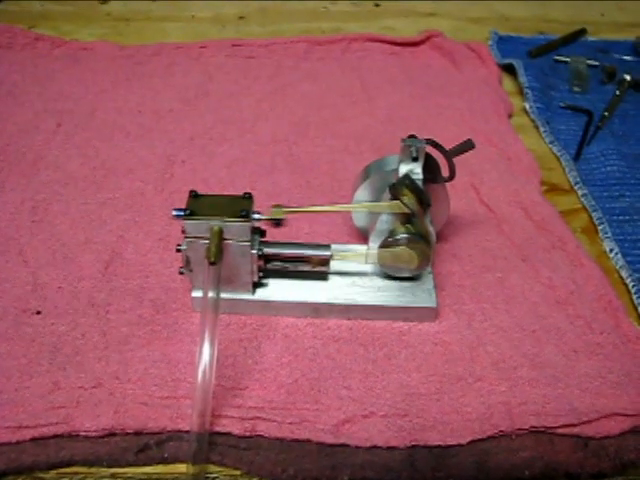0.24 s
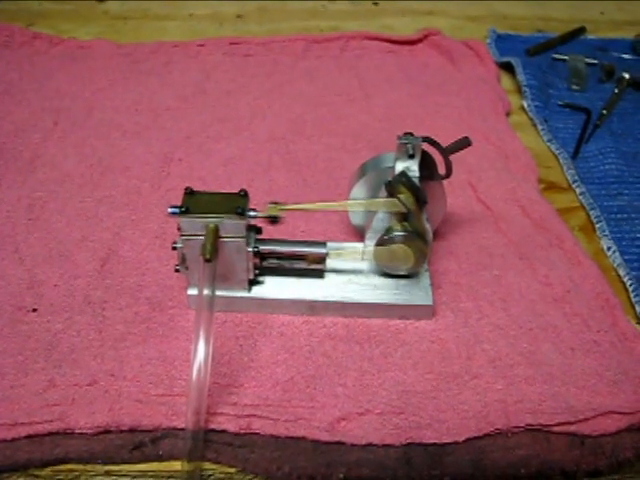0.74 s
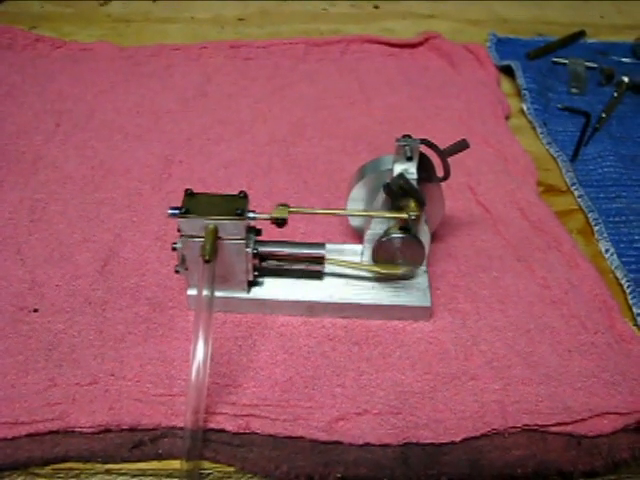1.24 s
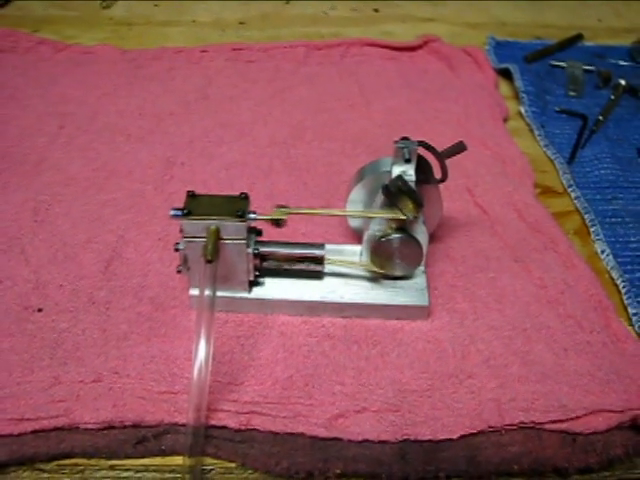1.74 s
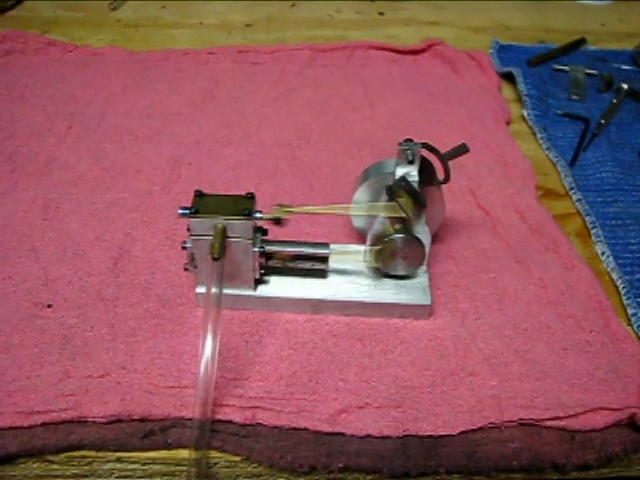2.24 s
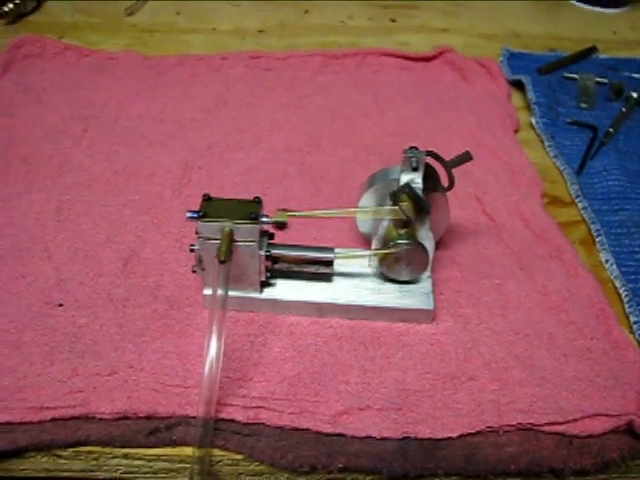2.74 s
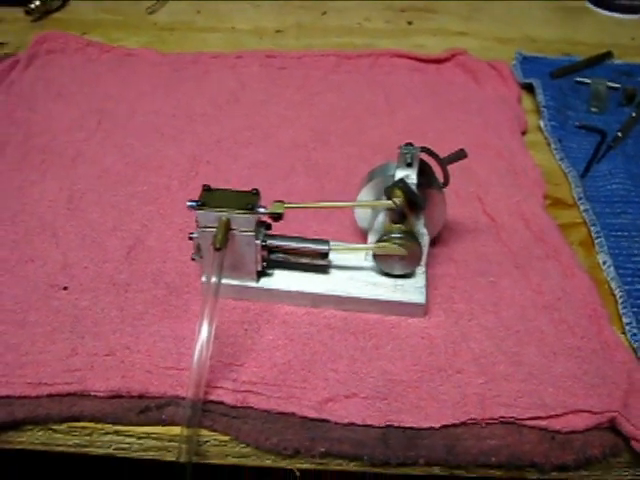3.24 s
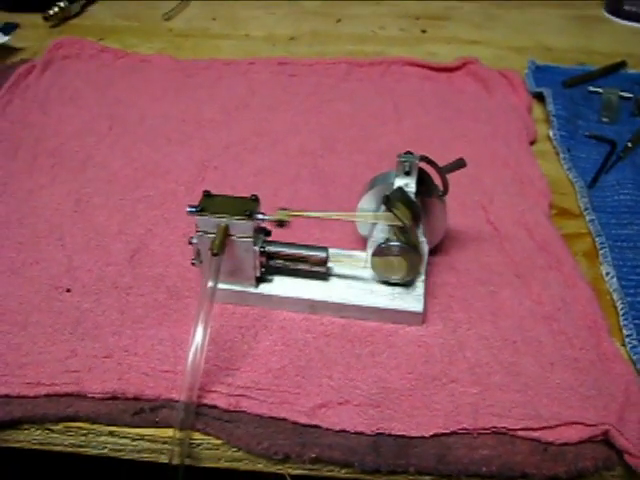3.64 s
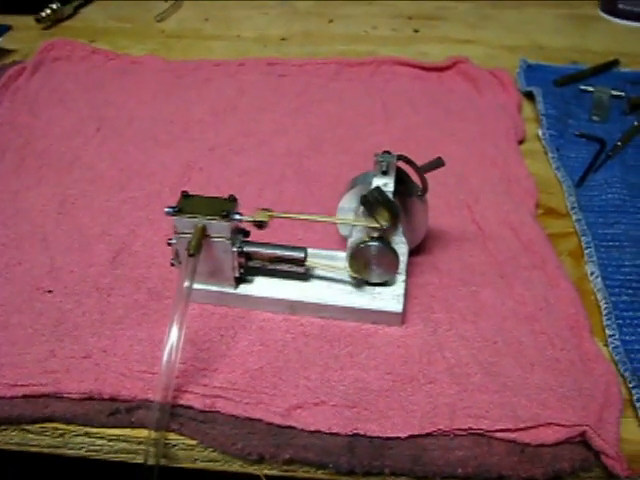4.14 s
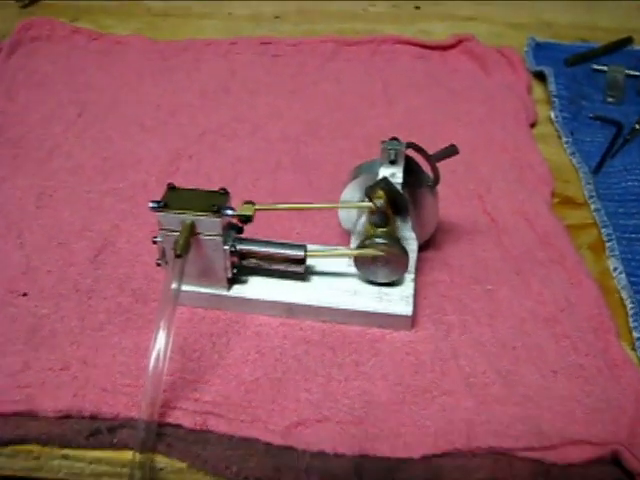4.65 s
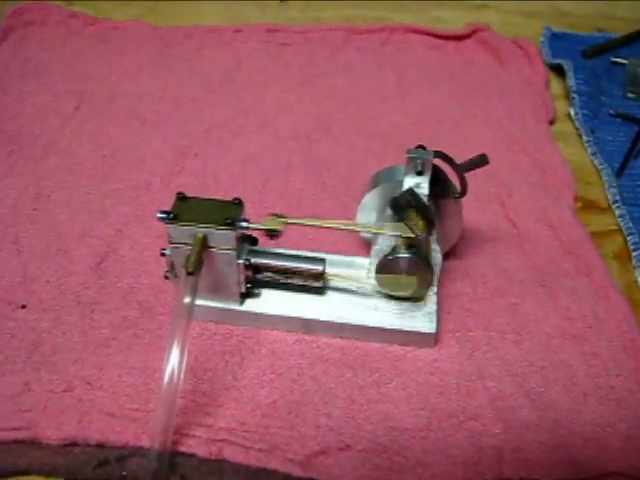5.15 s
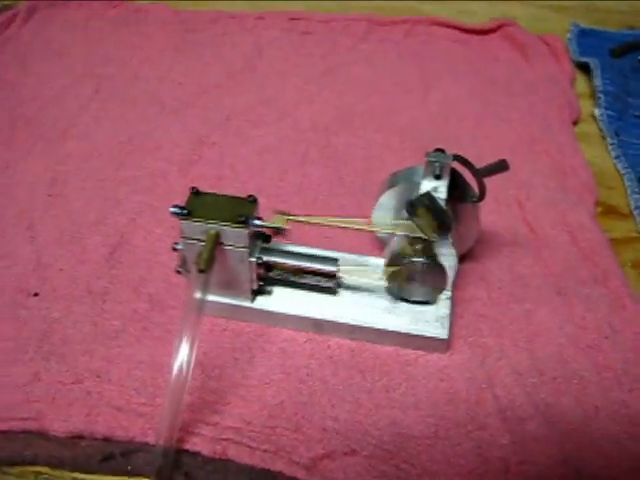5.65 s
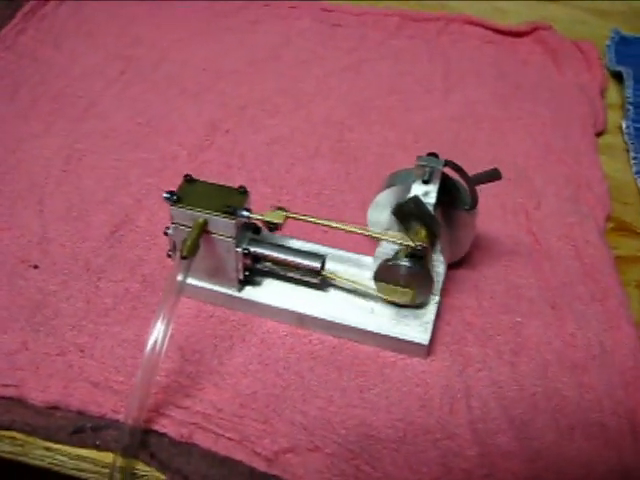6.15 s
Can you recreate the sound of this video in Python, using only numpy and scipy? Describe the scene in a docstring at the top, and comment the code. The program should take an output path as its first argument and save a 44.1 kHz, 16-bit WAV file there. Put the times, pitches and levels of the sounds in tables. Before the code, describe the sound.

From 0 s a small model engine is already running on compressed air, close and dry in stereo, at nearly ten turns per second. Every turn has a hard, bright crank knock, preceded by a light valve-gear tick and loose rattle, with a small valve pop half a turn later. Two slightly different sharp, airy exhaust hisses alternate, making a continuous chuffing chatter. Soft low thumps ring the bench under a quiet hum, rumble and room noise. Knocks vary a little in strength, some fuller between about 1.3 and 2.3 s; hiss and hum dip briefly near 2.6 s. A faint low whine surfaces around 1 s and again from 3.7 to 4.4 s. The pace eases very slightly toward the end. Between 4.9 and 5.7 s a few dull handling bumps thud and scrape near the microphone. The engine keeps running until the cut at about 6.4 s.

```python
"""A small model steam engine runs on compressed air on a cloth-covered bench, heard close up in stereo.
From the start, hum, rumble and room noise (tones and shaped noise) lie under two alternating exhaust hisses.
Each turn, soft pushes thump the bench modes; the valve gear ticks, the gear rattles, the crank knocks and
the valve pops open half a turn later, all as blows that ring one set of frame modes. A faint whine comes
and goes; late on, a few dull handling bumps (a ring and a noise burst) thud and scrape near the microphone."""
import sys
import numpy as np
from scipy import signal
from scipy.fft import rfft, irfft
from scipy.io import wavfile
from scipy.ndimage import uniform_filter1d

SR = 44100
rng = np.random.default_rng(int(sys.argv[2]) if len(sys.argv) > 2 else 0)


def digitize_waveform(pressure):
    """Quantize a signal to 16-bit integers and store it at the path in sys.argv[1].

    Rows of a 2-D input are taken as channels; values are limited to [-1, 1].
    """
    field = np.atleast_2d(pressure).T
    bounded = np.clip(field, -1, 1)
    quanta = np.round(bounded * 32767).astype(np.int16)
    wavfile.write(sys.argv[1], SR, quanta)


N = 281799  # samples


def undb(db):
    """Gain from decibels."""
    return 10 ** (np.asarray(db) / 20)


def curve(x, table):
    """Second column of a two-column table, read at x along the first."""
    return np.interp(x, *np.transpose(table))


def walk(rate_hz):
    """Random levels held for 1 / rate_hz seconds and slewed twice; spread near 1."""
    hold = int(SR / rate_hz)
    steps = np.repeat(rng.standard_normal(N // hold + 1), hold)
    return 1.173 * uniform_filter1d(uniform_filter1d(steps, hold), hold)[:N]


def ring(force, hz, t60_s):
    """One damped mode as a two-pole resonator; a unit impulse rings it with amplitude near 1."""
    decay = np.exp(-np.log(1000) / (t60_s * SR))
    step = 2 * np.pi * hz / SR
    return signal.lfilter([0, decay * np.sin(step)], [1, -2 * decay * np.cos(step), decay * decay], force)


def strikes(times_s, size):
    """Impulses of the given sizes at the given times."""
    at = np.round(np.asarray(times_s) * SR).astype(int)
    keep = (at >= 0) & (at < N)
    return np.bincount(at[keep], np.asarray(size)[keep], N)


# stereo width of the diffuse noise: (frequency [Hz], side minus mid [dB])
SIDE_WIDTH = [(60, -20), (110, -2), (200, -3), (380, -13.5), (700, -12), (1290, -14), (2380, -11),
              (4400, -2), (8120, -7.5), (15000, 2.5)]
# left-right balance of the diffuse noise: (frequency [Hz], left minus right [dB])
BALANCE = [(60, 6), (110, -1), (200, 6), (380, 0.5), (700, 0), (1290, 2), (2380, -2.5), (4400, 3.5),
           (8120, 1.0), (15000, 0)]


def wide_noise(spectrum):
    """Stereo noise of a given spectrum, rms 1; an independent side signal widens it."""
    log_hz = np.log(np.fft.rfftfreq(N, 1 / SR) + 1)

    def read(table):
        hz, db = np.transpose(table)
        return np.interp(log_hz, np.log(hz), db)

    mid, side = rfft(rng.standard_normal((2, N))) * undb(read(spectrum))
    side = side * undb(read(SIDE_WIDTH))
    lean = undb(read(BALANCE) / 2)
    out = irfft(np.array([(mid + side) * lean, (mid - side) / lean]), N)
    return out / np.std(out)


# running levels: (time [s], hiss [dB before stroke gain and flow], hum [dB before waver])
LEVELS = [(0.0, -30.5, -73), (0.3, -32, -55), (.85, -30.5, -55.5), (1.5, -29.5, -55), (2.1, -29, -55),
          (2.46, -30, -53), (2.63, -33, -68), (2.76, -33, -56.5), (3.6, -31, -51.5), (4.38, -29.5, -48),
          (4.48, -31.5, -58), (5.25, -30.5, -52), (5.71, -31, -57), (6.39, -30.5, -51.5)]


def each_turn(times_s, db, spread_db=.9):
    """Level of a moving part at given times: it follows the hiss and differs a little every turn."""
    at, hiss_db, _ = np.transpose(LEVELS)
    return np.interp(times_s, at, hiss_db) + db + spread_db * rng.standard_normal(len(times_s))


def crank():
    """Turn times, the knocks plus one turn at each end, and the crank angle in turns."""
    knock_s = np.array(KNOCKS)[:, 0]
    turns = np.r_[2 * knock_s[0] - knock_s[1], knock_s, 2 * knock_s[-1] - knock_s[-2]]
    return turns, np.interp(np.arange(N) / SR, turns, np.arange(len(turns))) % 1


# workshop tones, in order hum, whine, rumble: (mean frequency [Hz])
TONES = [120, 282, 28]
# the faint whine that comes and goes: (time [s], level [dB before waver])
WHINE = [(0, -68), (.75, -68), (.9, -61), (1.1, -68), (3.6, -67), (3.75, -56), (4.4, -57), (4.55, -68),
         (6.39, -68)]
# spectrum of the room noise: (frequency [Hz], relative level [dB per Hz])
ROOM = [(20, -14), (40, -19), (70, 12), (150, -8.5), (300, 3), (700, 2), (1200, -19), (3000, -15),
        (16000, -63)]


def workshop(rumble_db, room_db=-55):
    """Three low tones, unsteady in level and pitch, over soft room noise."""
    t = np.arange(N) / SR
    at, _, hum_db = np.transpose(LEVELS)
    levels_db = [np.interp(t, at, hum_db), curve(t, WHINE), rumble_db]
    tones = 0
    for hz, db in zip(TONES, levels_db):
        waver_db = 3.5 * walk(16)
        drift = 1 + .015 * walk(14)
        tones = tones + undb(db + waver_db) * np.sin(2 * np.pi * np.cumsum(hz * drift) / SR)
    return tones + undb(room_db) * wide_noise(ROOM)


# hiss spectrum of the return stroke: (frequency [Hz], relative level [dB per Hz])
BACK_HISS = [(470, -34), (800, -12.5), (1030, -5), (1880, -3), (2150, -5), (2870, -4.5), (3340, -8),
             (5110, 0.5), (6330, -9.5), (7450, -2), (9690, -3), (10800, 2), (11800, -6.5), (15200, -5.5),
             (16000, -50)]
# exhaust flow of the return stroke: (crank angle [turns], level [dB before gain])
BACK_FLOW = [(0, -8), (.06, -20), (.15, -25), (.495, -25), (.515, 0), (.64, 0), (1, -9)]
# hiss spectrum of the out stroke: (frequency [Hz], relative level [dB per Hz])
OUT_HISS = [(470, -22.5), (950, -8.5), (1250, -4.5), (1700, -1.5), (2300, -6.5), (2900, -7), (3600, -9),
            (4300, -6.5), (5050, 3), (6200, -13), (7500, -2.5), (9600, -3), (11000, 2), (12800, -11),
            (14700, -5.5), (16000, -18)]
# exhaust flow of the out stroke: (crank angle [turns], level [dB before gain])
OUT_FLOW = [(0, -25), (.06, -10), (.17, -4), (.25, -2), (.35, -4), (.495, -12), (.515, -25), (1, -25)]


def exhaust(angle, out_gain_db=4.0, back_gain_db=1.37):
    """Each stroke hisses through its own port as gated shaped noise; the jet flickers slightly."""
    at, hiss_db, _ = np.transpose(LEVELS)
    strokes = ((OUT_HISS, OUT_FLOW, out_gain_db), (BACK_HISS, BACK_FLOW, back_gain_db))
    hiss = 0
    for colour, flow, gain_db in strokes:
        flicker_db = .6 * walk(150) + .9 * walk(800)
        hiss = hiss + wide_noise(colour) * undb(curve(angle, flow) + gain_db + flicker_db)
    return hiss * undb(np.interp(np.arange(N) / SR, at, hiss_db))


def rumble_cut(x, cut_hz=55):
    """High-pass that takes the lowest bass off the bench and the handling."""
    return signal.sosfilt(signal.butter(2, cut_hz, "high", fs=SR, output="sos"), x)


# pushes on the bench in a turn: (crank angle [turns], level re the thump [dB before scatter], direction [+1/-1])
PUSHES = [(.065, -9, 1), (.395, -5, -1), (.455, -7, -1), (.6, -6, 1), (.85, -12, -1), (.92, -2, 1),
          (.955, -2, -1), (.985, -5, 1)]
# modes of the bench top: (frequency [Hz], t60 [s], level [dB])
BENCH = [(70, 0.058, -5), (160.8, 0.099, -12), (186, 0.017, -4.5), (211, 0.064, -5.5), (433, 0.011, -15)]


def bench(turns, thump_db=-7.5, push_s=0.0006, scatter_db=2.0):
    """Soft pushes from the reversing piston ring the modes of the bench top."""
    thump = each_turn(turns[1:], thump_db)
    force = 0
    for turn, db, direction in PUSHES:
        push_db = thump + db + scatter_db * rng.standard_normal(len(thump))
        force = force + strikes(turns[:-1] + turn * np.diff(turns), direction * undb(push_db))
    force = uniform_filter1d(force, int(push_s * SR))
    return rumble_cut(sum(undb(db) * ring(force, hz, t60_s) for hz, t60_s, db in BENCH))


# valve timing in turns: the rod ticks just before the knock, the valve pops half a turn after it
TICK_TURN, POP_TURN, PLAY_S = .861, .519, .0003
# levels re the running hiss level, before each mode's share: low ring of the knock, tick, rattle, pop
LOW_DB, TICK_DB, RATTLE_DB, POP_DB = 12.5, 8.5, 6, 10
RATTLE_FADE_DB_PER_S, LOW_SWELL_DB_PER_S = -.5, .35  # the rattle weakens and the knock deepens with time
# crank knocks, one a turn: (time [s], middle ring [dB before mode share], high ring [dB before mode share])
KNOCKS = [(.0336, -18.9, -16), (.1335, -12.4, -8), (.2347, -21.3, -16.3), (.336, -18.4, -17),
          (.4356, -16.9, -17.3), (.5347, -21.1, -13.3), (.6333, -18.6, -17.7), (.7351, -18.1, -17.9),
          (.8391, -18.4, -14.9), (.942, -20.6, -14.8), (1.0474, -19.2, -17.8), (1.1558, -17.1, -22),
          (1.263, -14.8, -21.1), (1.3667, -18.5, -16.7), (1.4713, -13.9, -9.1), (1.5749, -12.6, -12),
          (1.6781, -13.9, -16.3), (1.7803, -14.5, -13.1), (1.8818, -10.2, -10.7), (1.9841, -15.3, -15.3),
          (2.0873, -14.6, -16.6), (2.1894, -15.5, -18), (2.2941, -13.6, -10.4), (2.3977, -19, -13.9),
          (2.4995, -19, -13.9), (2.6001, -16.9, -6.4), (2.7012, -20.6, -19.3), (2.8045, -23.2, -17.3),
          (2.9068, -17.2, -20.2), (3.0097, -18.4, -23.8), (3.1143, -20.4, -16.6), (3.2186, -22.9, -12.6),
          (3.3251, -19.8, -17.7), (3.4332, -20, -15.2), (3.538, -14.6, -11.4), (3.6421, -18.6, -19.4),
          (3.7451, -19.3, -16.5), (3.8506, -17.2, -17.9), (3.9599, -17.8, -18), (4.0721, -13.3, -20.5),
          (4.1799, -14, -13.8), (4.2869, -16.4, -17.9), (4.3922, -15.1, -7.9), (4.5012, -15, -14.9),
          (4.6088, -14.5, -13.6), (4.7162, -12.9, -9.8), (4.8227, -17.8, -21), (4.9279, -16.9, -16.4),
          (5.0356, -19.3, -18.5), (5.1459, -18.5, -18.1), (5.2543, -19.2, -14.2), (5.3616, -17.8, -16.4),
          (5.4698, -18.6, -16.6), (5.582, -19.3, -19.7), (5.699, -19, -17.3), (5.8139, -19.5, -16.5),
          (5.9264, -18.5, -21.9), (6.038, -18.8, -17.9), (6.1493, -20.9, -15.3), (6.2613, -22.6, -17.7),
          (6.3699, -19.1, -15.5)]
# modes of the engine frame: (frequency [Hz], t60 [s], left minus right [dB], then the share [dB] for
# knock, tick, bright contact, dull clack)
FRAME = [(1340, 0.011, 23, -28.5, -53, -75, -40), (1471, 0.047, 2, -18.5, -52, -78, -19.5),
         (1850, 0.0066, 4.5, -4, -10.5, -51, -14), (2105, 0.0054, -0.5, -1, -1.5, -12, -20),
         (2936, 0.007, -3.5, 0, -11, -37, -5.5), (3250, 0.005, -5, -2.5, -26, -27, -0.5),
         (3643, 0.0036, 14, -11, -9.5, -34, -15), (4900, 0.0086, 11, -17.5, -10.5, -10, -4.5),
         (7000, 0.0082, 14, -54, -20, -15.5, -16), (8010, 0.0065, 8, -50, -11, -5.5, -20),
         (8690, 0.0037, -6.5, -46, -9, -1, -28), (10430, 0.0035, 11.5, -1, -34, -4.5, -21),
         (11020, 0.012, -2.5, -1, -8, -22, -30), (13200, .005, 2, -33, -36, -38, -30),
         (14600, 0.0056, 8, -15, -31, -13, -30)]


def linkage(turns, radiate_hz=1180, feet_hz=430, feet_db=-26, scatter_db=.9):
    """Every contact rings the same frame, each place with its own share of the modes."""
    def late(when, lag_s, spread_s):
        return when + lag_s + spread_s * rng.standard_normal(len(when))

    knock_s, middle, high = np.transpose(KNOCKS)
    tick_s = late(turns[:-1], TICK_TURN * np.diff(turns), PLAY_S)
    pop_s = late(turns[:-1], POP_TURN * np.diff(turns), PLAY_S)
    low = each_turn(knock_s, LOW_DB + LOW_SWELL_DB_PER_S * knock_s)
    tick = each_turn(tick_s, TICK_DB)
    pop = each_turn(pop_s, POP_DB)
    rattle = each_turn(tick_s, RATTLE_DB + RATTLE_FADE_DB_PER_S * tick_s)

    # contacts around the main blows, slack before the knock and the rest after: lag and spread in seconds
    slack, bounce = late(knock_s, -.0009, .0001), late(knock_s, .0022, .0002)
    settle, chatter = late(knock_s, .009, .0006), late(knock_s, .001, .0003)
    rattle_1, rattle_2 = late(tick_s, .0068, .0003), late(tick_s, .009, .0005)
    pop_2, seat = late(pop_s, .0015, .0003), late(pop_s, .0015, .0006)

    out = 0
    for hz, t60_s, pan_db, knock_db, tick_db, bright_db, dull_db in FRAME:
        if hz < 2400:
            own = low
        elif hz < 6000:
            own = middle
        elif hz < 12000:
            own = high
        else:
            own = (low + high) / 2
        knock = own + knock_db
        rise_s = .0003 * (hz > 9500) - .0002  # the highest modes start a little later
        blows = [(knock_s + rise_s, knock),
                 (bounce, knock - 9.0 - 6 * (hz > 4000) - 4 * (hz < 2400)),  # one softer bounce of the pin
                 (settle, knock - 13 - 20 * (hz > 1600)),  # it settles with a dull tap
                 (slack, (3 * low + high) / 4 + bright_db - 2),  # slack is taken up before the knock
                 (chatter, knock - 7.5 - 5 * (hz < 2400)),  # the pin chatters in its bore
                 (tick_s, tick + tick_db),
                 (rattle_1, rattle + tick_db - 4.5),
                 (rattle_1, rattle + bright_db - 5),
                 (rattle_2, rattle + dull_db - .1),
                 (pop_s, pop + bright_db + 2.0),
                 (pop_2, pop + bright_db - 8),
                 (seat, pop + dull_db - 10.0)]
        force = 0
        for when, db in blows:
            blow_db = db + scatter_db * rng.standard_normal(len(when))
            force = force + strikes(when, undb(blow_db))
        out = out - ring(force, hz, t60_s) * undb([[pan_db / 2], [-pan_db / 2]])
    # so small a frame radiates no bass
    frame = signal.sosfilt(signal.butter(6, radiate_hz, "high", fs=SR, output="sos"), out)

    # a little of the main blows reaches the bench through the feet
    feet = strikes(knock_s, undb(low)) + strikes(tick_s, undb(tick))
    feet = feet + strikes(rattle_1, undb(rattle + 14.5)) + strikes(seat, undb(pop + 4))
    feet = undb(feet_db) * ring(uniform_filter1d(feet, size=20), feet_hz, .015)
    return frame + feet


# handling bumps: (time [s before a 1.4 ms delay], level [dB before a 3.5 dB cut], thud pitch [Hz],
# scrape gain [dB])
HANDLING = [(4.921, -32, 350, -5.5), (5.153, -31.5, 334, -6.5), (5.223, -25.5, 326, -7.5),
            (5.358, -34, 207, -1), (5.615, -32, 398, -2.5), (5.644, -37, 371, -4), (5.697, -30.5, 220, -2)]


def handling():
    """Dull handling bumps close to the microphone: a short low ring and a decaying burst of scrape noise."""
    scrape_band = signal.butter(2, [150, 950], "band", fs=SR, output="sos")
    scrape = signal.sosfilt(scrape_band, rng.standard_normal(N))
    scrape = scrape / np.std(scrape)
    out = 0
    for s, db, hz, scrape_db in HANDLING:
        blow = strikes([s + 0.0014], [undb(db - 3.5)])
        drag = signal.lfilter([1], [1, -np.exp(-1 / (0.015 * SR))], blow)  # time constant 15 ms
        thud = ring(uniform_filter1d(blow, size=30), hz, .035)
        out = out + thud + undb(scrape_db) * drag * scrape
    return rumble_cut(out)


def scene():
    """Engine frame, bench, handling, exhaust and workshop together."""
    rumble_db = -58 + 3 * walk(2.98)  # slow swell of the rumble
    turns, angle = crank()
    engine = linkage(turns) + bench(turns) + handling() + exhaust(angle)
    return engine + workshop(rumble_db)


def record(dry, top_hz=15900):
    """Soft saturation rounds the loudest peaks, then a steep low-pass cuts the top."""
    rounded = np.tanh(.7 * dry) / .7
    return signal.sosfilt(signal.ellip(8, .2, 70, top_hz, fs=SR, output="sos"), rounded)


dry = scene()
out = record(dry)
digitize_waveform(out)
```